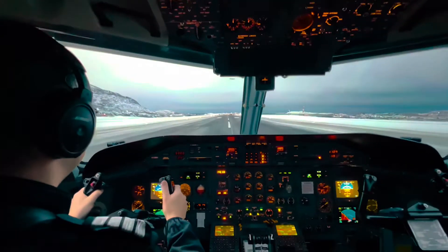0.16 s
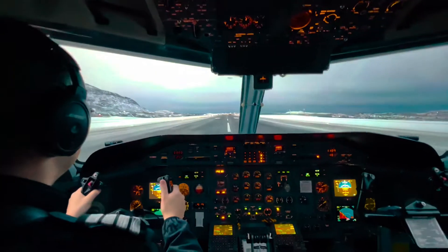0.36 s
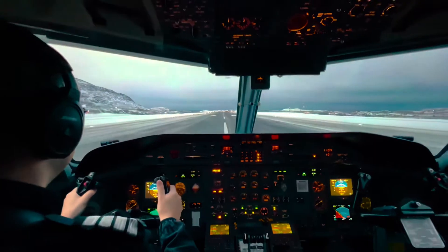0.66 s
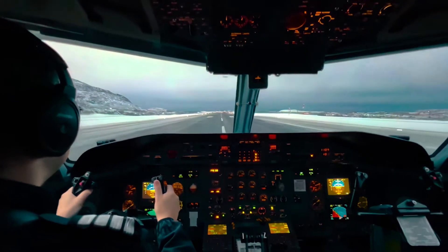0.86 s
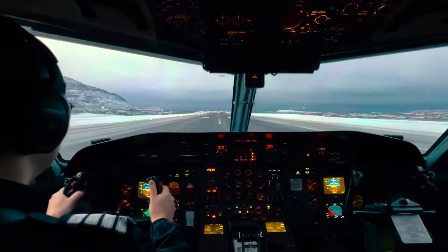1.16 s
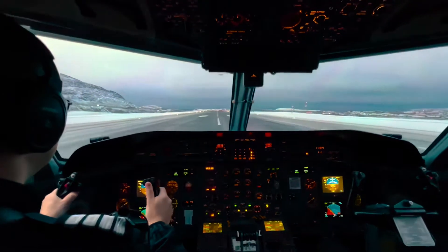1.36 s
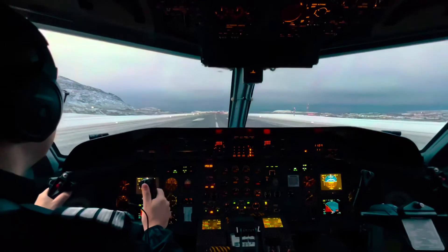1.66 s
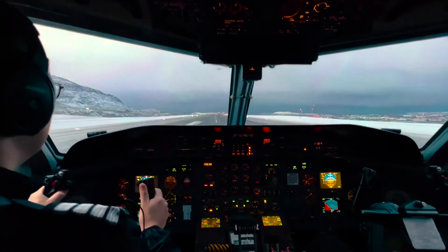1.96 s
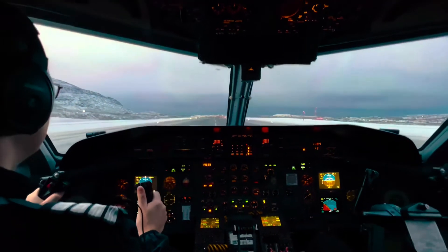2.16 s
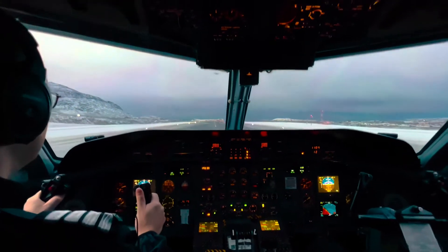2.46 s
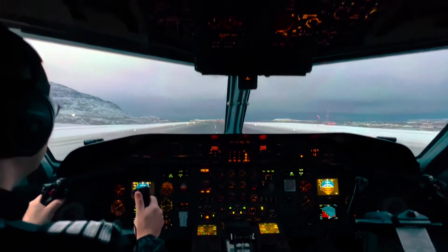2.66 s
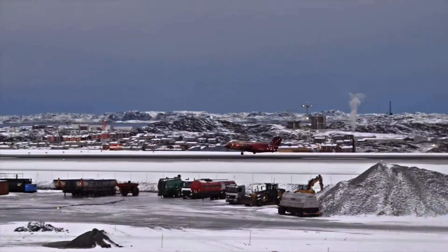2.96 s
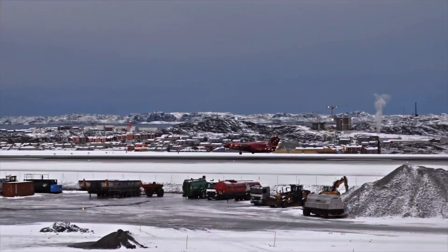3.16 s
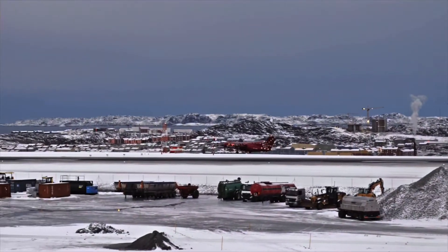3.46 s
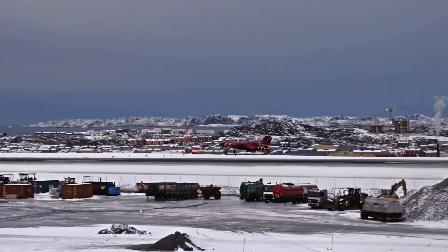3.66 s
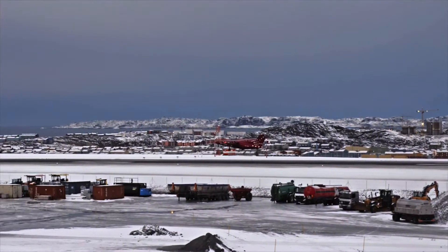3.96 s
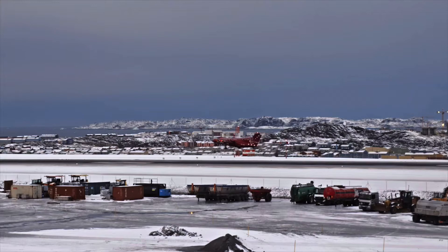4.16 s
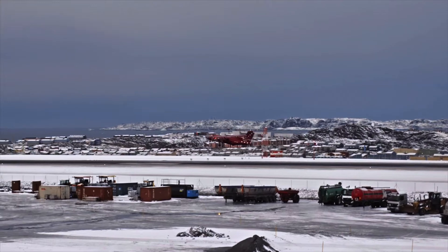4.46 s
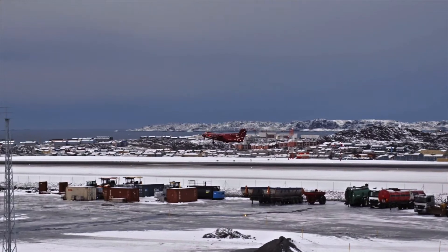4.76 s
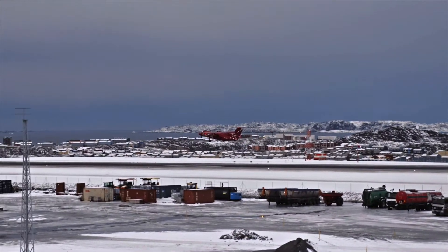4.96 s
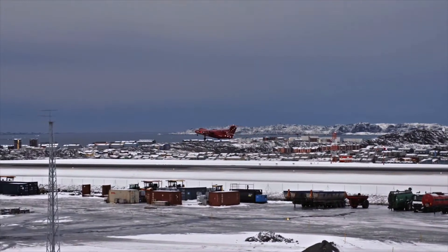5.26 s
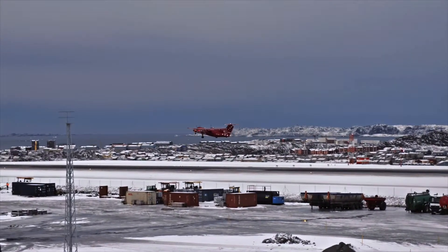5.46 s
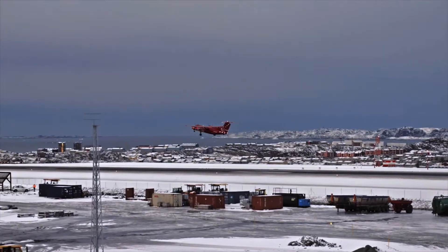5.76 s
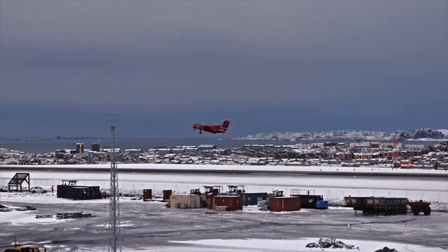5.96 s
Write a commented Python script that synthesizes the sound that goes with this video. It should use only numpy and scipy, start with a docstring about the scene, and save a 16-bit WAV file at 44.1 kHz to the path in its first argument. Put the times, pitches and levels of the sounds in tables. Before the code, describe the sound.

Four propellers hum together as a heavy low drone with slow beating and a buzzing edge, captured in stereo inside a small cockpit. Wheel rumble and dull thumps come first, then lessen. One hard rattle sounds soon after the first second, followed later by a tiny bright tick. Wavering gear tones swell midway, a fine piercing whine comes and goes, and steady wind roar surrounds everything.

```python
"""Four propellers drone in the cockpit of a turboprop taking off; slightly out of step, their harmonics throb.
Upper blade harmonics buzz, gearbox tones waver, and turbine tones whine with blade-rate sidebands over intake hiss.
The wheels' noise rumble fades as the wings take the weight, and bumps ring decaying airframe modes.
Coloured noise rushes along the hull; a loose fitting rattles as short bursts of resonant noise."""
import sys
import numpy as np
from scipy import signal
from scipy.fft import rfft, irfft
from scipy.io import wavfile
from scipy.ndimage import map_coordinates

SR = 44100
rng = np.random.default_rng(int(sys.argv[2]) if len(sys.argv) > 2 else 0)


def master(y):
    """Save y as 16-bit WAV."""
    cut = np.clip(np.atleast_2d(y).T, -1, 1)
    pcm = np.round(cut * 32767)  # scale
    wavfile.write(sys.argv[1], SR, pcm.astype(np.int16))


N = 269892
T = np.arange(N) / SR  # s
SIDES = np.array([[1], [-1]])  # left, right


def undb(db):
    """Decibels to gain."""
    return 10 ** (np.asarray(db) / 20)


def unit(x):
    """Scale to rms 1."""
    return x / np.sqrt(np.mean(x ** 2))


def curves(table):
    """Each column of a table, joined by straight lines in time."""
    s, *columns = np.transpose(table)
    return [np.interp(T, s, c) for c in columns]


def turn(hz):
    """Running phase [rad] of a pitch curve, from a random start."""
    return 2 * np.pi * (np.cumsum(hz) / SR + rng.random())


def walk(rate_hz):
    """Smooth random drift with a spread near 1; rate_hz is random knots per second."""
    knots = rng.standard_normal(512)
    coarse = map_coordinates(knots, [T[::64] * rate_hz + 2], order=3, mode="wrap")
    return coarse.repeat(64)[:N]


def late(x, lag_s):
    """Delay by a fraction of a millisecond, as a linear phase shift."""
    f = np.fft.rfftfreq(N, 1 / SR)
    return irfft(rfft(x) * np.exp(-2j * np.pi * f * lag_s), N)


def noise(spectrum):
    """Noise of rms 1 with the given colour, interpolated in dB over log frequency."""
    hz, db = np.transpose(spectrum)
    f = np.fft.rfftfreq(N, 1 / SR) + 1e-3  # avoids log(0)
    gain = undb(np.interp(np.log(f), np.log(hz), db))
    return unit(irfft(rfft(rng.standard_normal(N)) * gain, N))


def diffuse(spectrum, alike_hz):
    """Cabin noise on two sides: alike in the bass, increasingly unrelated around and above alike_hz."""
    f = np.fft.rfftfreq(N, 1 / SR)
    alike = 1 / (1 + (f / alike_hz) ** 2)
    mid = irfft(rfft(noise(spectrum)) * np.sqrt(1 + alike), N)
    side = irfft(rfft(noise(spectrum)) * np.sqrt(1 - alike), N)
    return unit(np.array([mid + side, mid - side]))


def wavering(phase, rate_hz, fade):
    """A tone of rms near 1 whose strength and phase wander on the way through the hull."""
    in_phase = (1 + fade * walk(rate_hz)) * np.sin(phase)
    quadrature = fade * walk(rate_hz) * np.cos(phase)
    return np.sqrt(2 / (1 + 2 * fade ** 2)) * (in_phase + quadrature)


def propellers():
    """Running blade phase of each propeller; they slip past each other as their speeds differ."""
    # blade rates; the third sags late in the roll: (time [s], four propellers' rates [Hz])
    blade_rates = [(0.0, 79.66, 80.54, 79.08, 79.3), (1.0, 79.51, 80.58, 79.45, 79.57),
                   (2.0, 79.48, 80.51, 79.62, 79.43), (3.0, 79.45, 80.55, 79.08, 79.97),
                   (3.5, 79.63, 80.45, 79.99, 78.94), (4.0, 79.61, 80.45, 80.06, 79.53),
                   (4.5, 79.35, 80.93, 77.87, 79.43), (5.0, 79.91, 80.32, 77.39, 79.43),
                   (5.5, 79.56, 80.61, 77.04, 79.58), (6.1, 79.68, 80.4, 77.64, 79.58)]
    # a moment when each propeller is in step with the first: [s]
    in_step_s = [0, 2.988, 4.905, 2.818]
    phases = [turn(hz) for hz in curves(blade_rates)]
    return [phase - np.interp(s, T, phase - phases[0]) for phase, s in zip(phases, in_step_s)]


def drone(blades):
    """Deep harmonics of four propellers add and cancel, so they throb; standing waves differ by side."""
    # propellers: (left minus right [dB], base peak levels of blade harmonics 1, 2, 3 [dB])
    propeller_levels = [(1.04, -12, -29.5, -28.4), (1.3, -13.5, -28, -33.5), (1.3, -17.5, -28, -34.5),
                        (1.8, -16.5, -20.5, -41)]
    # standing wave per harmonic: (left minus right [dB], left lag [rad], antiphase stray level [dB])
    standing_waves = [(-1.2, 0.062, -33), (-3, 0.3, -32.5), (-1.8, 1, -39)]
    # slow level change, not applied to the stray: (time [s], harmonics 1, 2, 3 [dB])
    harmonic_changes = [(0, -2.1, 0.7, 1.5), (2, -2.5, -.6, 3), (3, -.3, -1, 1.6), (4, -3.4, 3.6, 2),
                        (5, 1.1, -.8, -2.4), (6.1, 3.8, -.6, -3)]
    out = np.zeros((2, N))
    for k, (wave, change_db) in enumerate(zip(standing_waves, curves(harmonic_changes))):
        pan_db, left_lag_rad, stray_db = wave
        multiple = k + 1
        lag_rad = np.array([[left_lag_rad], [0]])
        for blade, (side_db, *harmonic_db) in zip(blades, propeller_levels):
            side_gain = undb(SIDES * (pan_db + side_db) / 2)
            tone = np.sin(multiple * blade - lag_rad)
            out += side_gain * undb(harmonic_db[k] + change_db) * tone
        # antiphase stray: the sum does not cancel on both sides at once
        out += undb(stray_db) * wavering(multiple * blades[0], rate_hz=1.45, fade=4.3) * SIDES
    return out


def buzz(blades, peak_s=4.15, peak_db=2.5, fall_db_per_s=1.4):
    """Upper harmonics of the four propellers beat quickly; the buzz swells to a peak and eases."""
    # upper blade harmonics: (multiple, relative level [dB])
    harmonics = [(4, -46.5), (5, -44.5), (6, -50), (7, -54), (8, -57.5), (9, -60.5), (10, -57.5),
                 (11, -59.5)]
    # strength of each propeller in these harmonics: [dB]
    propeller_db = [-3, -1.5, -3.5, -4]
    out = np.zeros((2, N))
    for blade, prop_db in zip(blades, propeller_db):
        for multiple, db in harmonics:
            phase = multiple * blade + 2 * np.pi * rng.random()
            skew_rad = .5 * rng.standard_normal((2, 1))
            out += undb(prop_db + db + 4.75 * walk(6)) * np.sin(phase + skew_rad)
    return out * undb(peak_db - fall_db_per_s * np.abs(T - peak_s))


def gears(waver_hz=5, fade=0.74, surge_db=1.5):
    """Thin gear tones reach each side by different paths, surge with the load and swell in mid-roll."""
    # gear tones: (pitch [Hz], relative level [dB])
    gear_tones = [(642, -56.5), (802, -54.5), (872, -55.5), (1352, -60), (1391, -57.5), (1604.5, -51),
                  (1804, -59), (1857, -61), (1890, -63), (2252, -62.5), (2630, -69), (3209, -70)]
    swell_s, swell_length_s = 2.5, 0.24
    early_db, late_db = -3, 1.2
    out = np.zeros((2, N))
    for hz, db in gear_tones:
        phase = turn(hz + 0.765 * walk(1.484))
        surge = undb(db + surge_db * walk(3.01))
        out += surge * np.array([wavering(phase, waver_hz, fade) for _ in range(2)])
    swell = (1 + np.tanh((T - swell_s) / swell_length_s)) / 2
    return out * undb(early_db + (late_db - early_db) * swell)


def turbines(blade, spread_hz=125, count=6):
    """The blades chop each turbine tone into a comb of sidebands; the intake hiss pulses with them."""
    # whine: (time [s], relative level [dB], pitch where strongest [Hz])
    whine_course = [(0, -40, 6770), (.9, -40.5, 6770), (2.4, -46.5, 6460), (3.1, -36.5, 6750),
                    (4.3, -40.5, 6620), (4.9, -38.5, 6720), (5.7, -36.5, 6600), (6.1, -48.5, 6620)]
    # turbine tones: (nominal start pitch [Hz], nominal end pitch [Hz], relative level [dB])
    turbine_tones = [(6667, 6657, 0), (6692, 6668, -4)]
    # intake hiss spectrum: (frequency [Hz], relative density [dB per Hz])
    intake_spectrum = [(2000, -42), (3800, -15.5), (5000, -14), (5600, -8), (6000, -1.5), (6300, -1.5),
                       (6650, 2.5), (7000, -4), (7700, -12), (8900, -10), (10400, -23.5), (12400, -14),
                       (13300, -19), (14000, -26)]
    left_lead_s = 0.0004944
    whine_db, centre_hz = curves(whine_course)
    blade_hz = np.gradient(blade) * SR / (2 * np.pi)
    whine = np.zeros(N)
    for start_hz, end_hz, turbine_db in turbine_tones:
        hz = np.linspace(start_hz, end_hz, N) + 2 * walk(1.5)
        phase = turn(hz)
        for k in range(-count, count):
            offset = (hz + k * blade_hz - centre_hz) / spread_hz
            strength = 1 / (1 + offset ** 2)
            path_rad = 2 * np.pi * rng.random()  # each sideband's own way through the hull
            sideband = wavering(phase + k * blade + path_rad, rate_hz=5, fade=0.8)
            whine += undb(turbine_db) * strength * sideband
    pulsing = (1 + .08 * np.sin(blade)) * undb(.85 * walk(16))
    direct = undb(whine_db + 1.8 * walk(12) + 1.7) * unit(whine)
    direct = direct + undb(-48) * pulsing * noise(intake_spectrum)
    scattered = undb(-40) * pulsing * np.array([noise(intake_spectrum), noise(intake_spectrum)])
    # direct sound comes from the left
    return np.array([direct, undb(-3.5) * late(direct, left_lead_s)]) + scattered


def wheels(start_db=-21.5, lift_db_per_s=2, soft_s=0.0085):
    """Runway rumble falls as the wings take the weight; bumps, softened by the tyres, ring low modes."""
    # rumble spectrum: (frequency [Hz], relative density [dB per Hz])
    rumble_spectrum = [(15, -47), (26, -26), (33, -3), (48, -9), (56, -5), (64, -6), (86, -3.5), (97, -1),
                       (112, -8.5), (145, -16), (200, -20), (300, -29.5), (720, -34), (1600, -68)]
    # rough and smooth stretches: (middle [s], half length to 1/e [s], rumble change [dB])
    patches = [(.62, 0.39, 4), (1.386, 0.18, 6), (1.85, 0.16, -2), (3.65, .5, 2.5)]
    # runway bumps: (time [s], relative level [dB])
    bumps = [(.71, -18), (1.3, -16), (2.34, -18)]
    # airframe modes: (pitch [Hz], t60 [s], relative level [dB])
    airframe_modes = [(38, .25, -13), (57.6, 0.49, -1), (96.6, 0.22, 6), (114.6, 0.6, 1), (139, 0.057, -4)]
    roll_db = start_db - lift_db_per_s * T
    for middle_s, half_s, db in patches:
        roll_db = roll_db + db * np.exp(-((T - middle_s) / half_s) ** 2)
    out = undb(roll_db) * diffuse(rumble_spectrum, alike_hz=380)
    for s, db in bumps:
        age = np.maximum(T - s, 0)
        ring = np.zeros(N)
        for hz, t60_s, mode_db in airframe_modes:
            ring += undb(mode_db - 60 * age / t60_s) * np.sin(2 * np.pi * hz * age)
        out = out + undb(db) * (1 - np.exp(-age / soft_s)) * ring
    return out


def airflow(speeding_db=-1.2, lag_s=0.00019, direct_db=-6.5):
    """Slipstream rushes along the hull; its low roar and its hiss flutter separately."""
    # rush spectrum: (frequency [Hz], relative density [dB per Hz])
    air_spectrum = [(30, -9), (120, 3.5), (200, 1.5), (265, -1), (340, -4.5), (460, -2), (640, -9.5),
                    (1000, -13), (1500, -16.5), (2000, -19.5), (2600, -19.5), (3300, -25.5), (5000, -28.5),
                    (14000, -57)]
    # part comes straight from the right side window
    window = undb(direct_db) * noise(air_spectrum)
    air = unit(diffuse(air_spectrum, alike_hz=382) + np.array([late(window, lag_s), window]))
    roar = signal.sosfilt(signal.butter(1, 800, fs=SR, output="sos"), air)
    hiss = air - roar
    roar_db = speeding_db * np.linspace(-1, 1, N) + 0.85 * walk(12)
    hiss_db = 1.3 * walk(18)
    return undb(-29.5 + .5 * walk(3.51)) * (undb(roar_db) * roar + undb(hiss_db) * hiss)


def rattles(t60_s=.035, cabin_t60_s=0.18, cabin_db=-15, pan_db=2):
    """A loose fitting knocks and ticks; each knock is followed by the short ring of the cockpit."""
    # contacts: (time [s], relative level [dB], lowest pitch excited [Hz])
    contacts = [(.28, -40, 700), (1.319, -34, 500), (1.3277, -24.5, 400), (1.3303, -22, 400),
                (1.337, -31, 700), (1.347, -35, 700), (1.78, -43, 2000), (2.279, -31, 7700),
                (2.286, -31, 7700)]
    # fitting's resonances: (pitch [Hz], width [Hz], relative level [dB])
    fitting_modes = [(1090, 150, 14.5), (2450, 310, 5), (3230, 400, 3), (3800, 940, 3), (6060, 1200, 7),
                     (7900, 520, -22), (9200, 960, -26)]
    out = np.zeros((2, N))
    age = T[:SR // 4]
    decay = undb(-60 * age / t60_s) + undb(cabin_db - 60 * age / cabin_t60_s)
    for s, db, low_hz in contacts:
        contact = rng.standard_normal((2, len(age)))
        ring = np.zeros((2, len(age)))
        for hz, width_hz, mode_db in fitting_modes:
            b, a = signal.iirpeak(hz, hz / width_hz, fs=SR)
            ring += undb(mode_db) * signal.lfilter(b, a, contact)
        band = signal.butter(5, [low_hz, 10000], "band", fs=SR, output="sos")
        ring = signal.sosfilt(band, unit(ring))
        start = int(s * SR)
        out[:, start:start + len(age)] += undb(db) * ring * decay
    return out * undb(SIDES * pan_db / 2)


def scene():
    """Everything that reaches the cockpit."""
    blades = propellers()
    engines = drone(blades) + buzz(blades) + gears() + turbines(blades[1])
    return engines + wheels() + airflow() + rattles()


def record(dry, top_hz=13500, ceiling=.92, edge_s=.003):
    """Cut the deepest bass, round the highest peaks, fade both ends and cut the top."""
    dry = signal.sosfilt(signal.butter(4, 28, "high", fs=SR, output="sos"), dry)
    dry = dry / (1 + (dry / ceiling) ** 10) ** (1 / 10)
    edge = np.minimum(np.minimum(T, T[::-1]) / edge_s, 1)
    dry = dry * np.sin(np.pi / 2 * edge) ** 2
    return signal.sosfilt(signal.ellip(8, .2, 70, top_hz, fs=SR, output="sos"), dry)


dry = scene()
out = record(dry)
master(out)
```